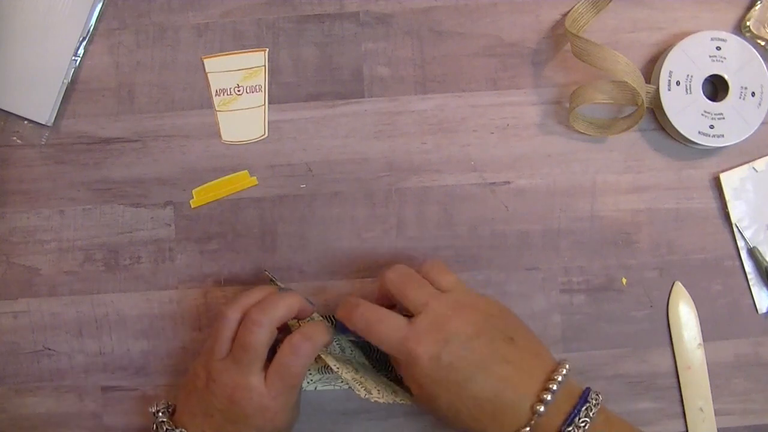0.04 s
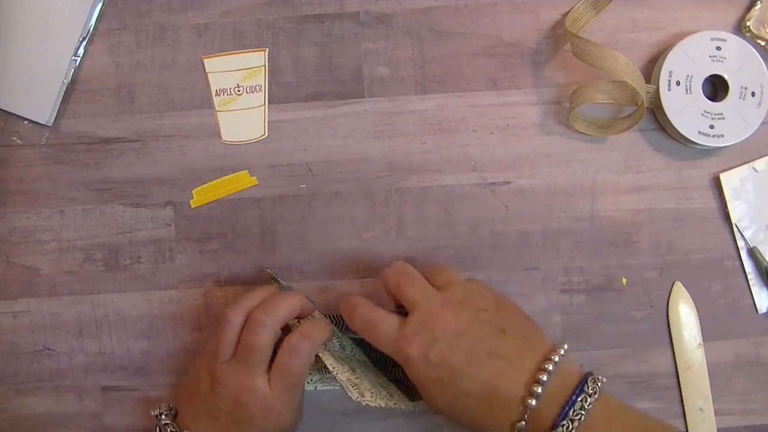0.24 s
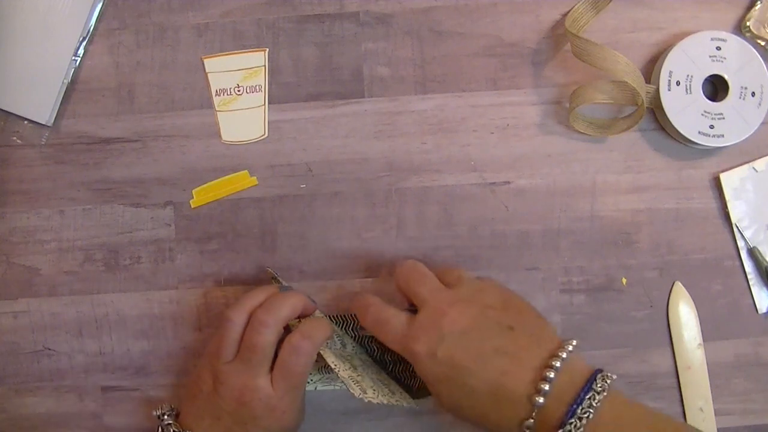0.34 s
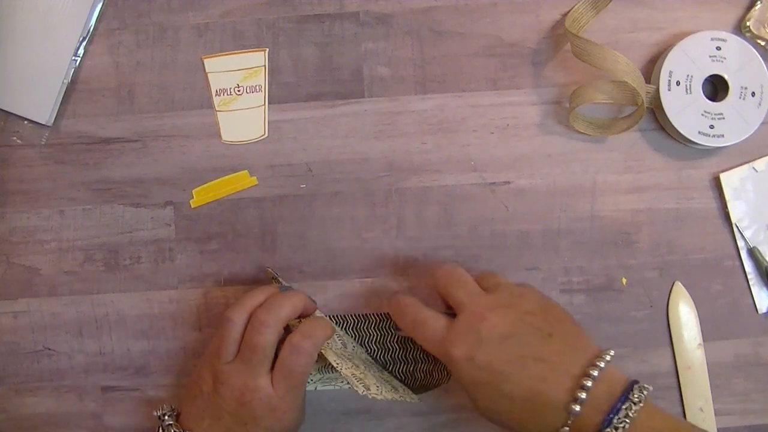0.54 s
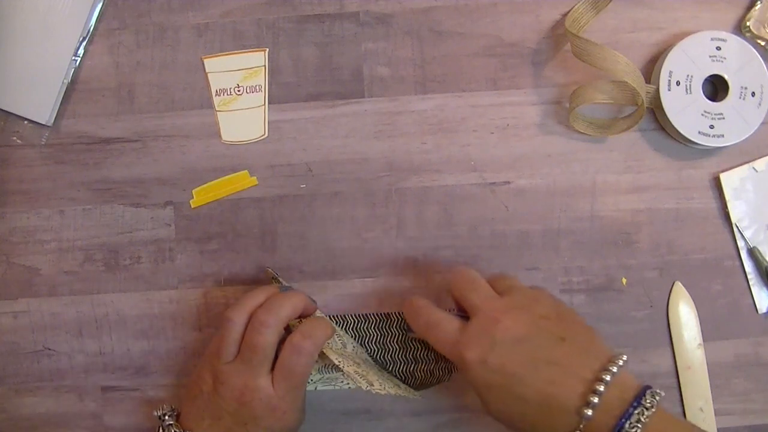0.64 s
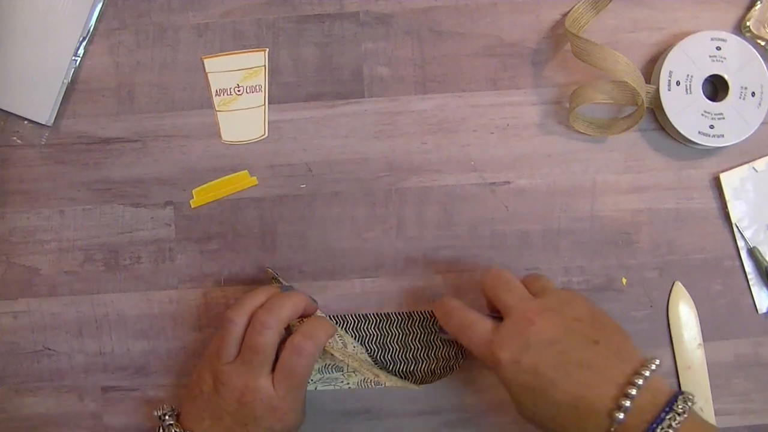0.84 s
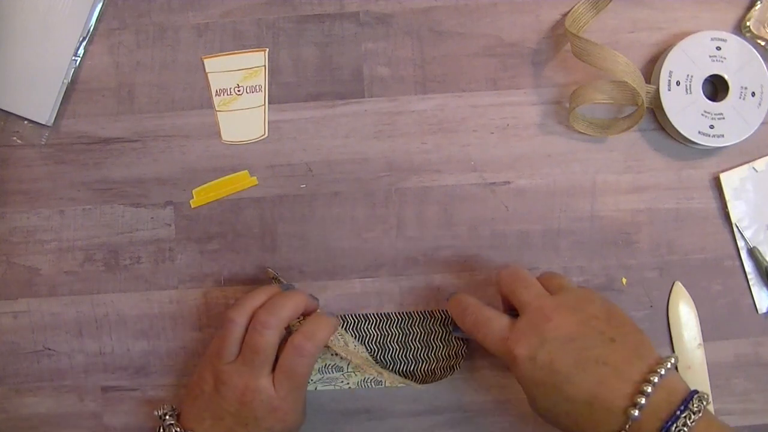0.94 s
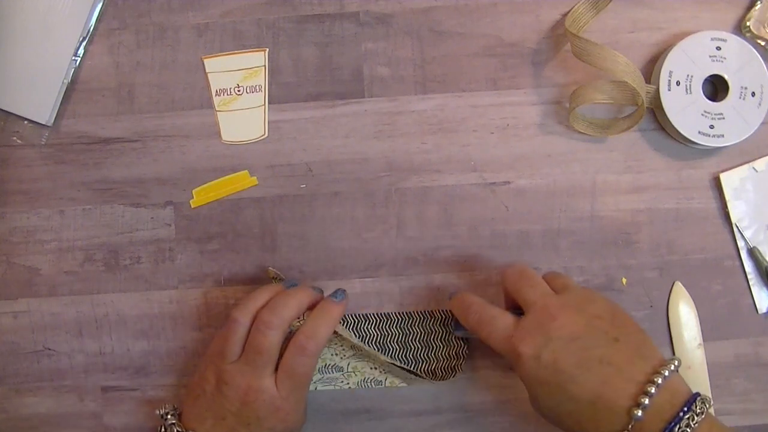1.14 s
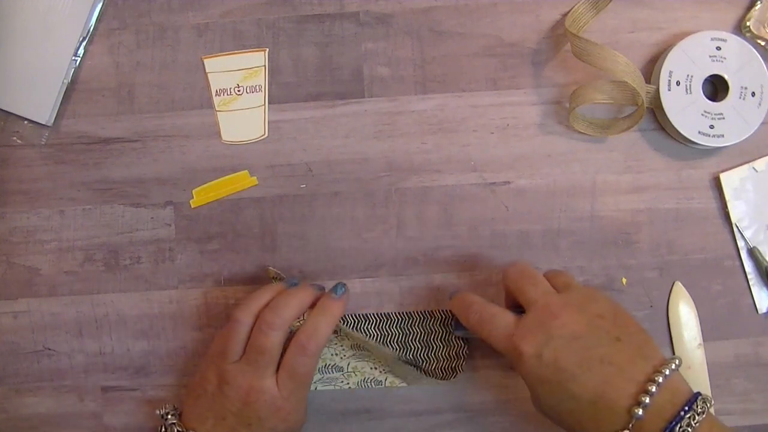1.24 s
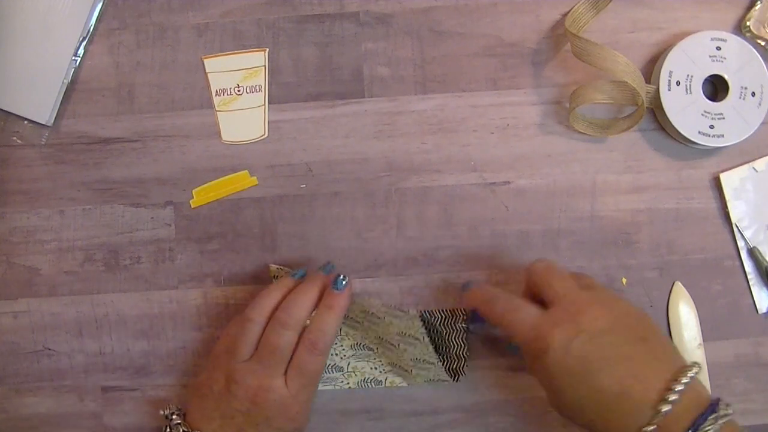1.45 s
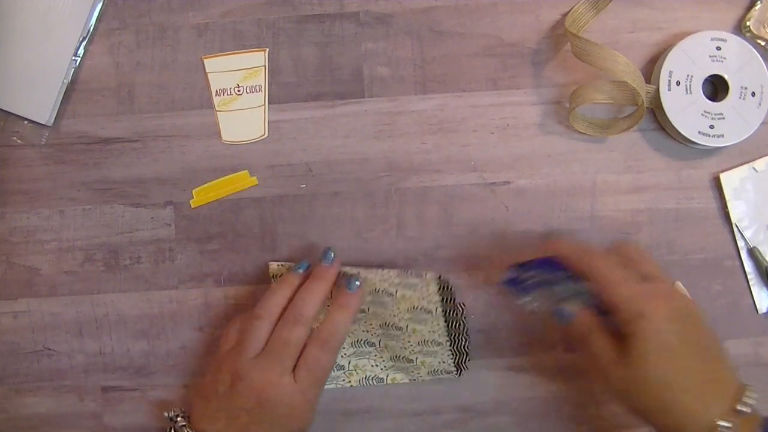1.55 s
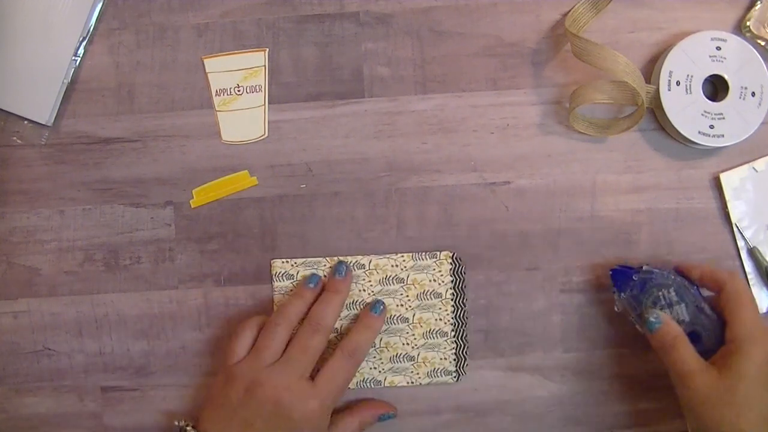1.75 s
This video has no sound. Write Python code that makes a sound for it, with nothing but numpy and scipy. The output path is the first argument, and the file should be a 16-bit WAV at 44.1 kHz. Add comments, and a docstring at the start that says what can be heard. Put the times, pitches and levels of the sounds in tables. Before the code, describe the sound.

An adhesive tape runner rolls over paper, close by in a quiet room. After a faint paper rustle, rapid plastic clicks start at 0.3 seconds and turn into a scratchy scrape with dull table thuds, dying by 1.2 seconds. A second short pull comes at 1.4 seconds. Just before 1.6 seconds the runner knocks lightly, then hard, and the paper rustles briefly.

```python
"""A handheld tape runner on paper at a craft table: quiet room, stereo microphone close by.
The paper stirs first. From 0.3 s the adhesive lets go in short bursts that ring the plastic shell;
the roll turns into a scratchy scrape, with dull thuds of the table top, and dies by 1.2 s. A second
short pull comes at 1.4 s, then the runner knocks, lightly and then hard, and the paper rustles."""
import sys
import numpy as np
from scipy import signal
from scipy.fft import rfft, irfft
from scipy.io import wavfile
from scipy.ndimage import uniform_filter1d

SR = 44100
rng = np.random.default_rng(int(sys.argv[2]) if len(sys.argv) > 2 else 0)


def unload_audio(sound):
    """Save the sound as a 16-bit wav file, at the path given as the first command line argument."""
    columns = np.transpose(np.atleast_2d(sound))
    # keep every value between -1 and 1, then stretch to whole-number steps
    steps = np.round(np.clip(columns, -1, 1) * 32767)
    wavfile.write(sys.argv[1], SR, steps.astype(np.int16))


N = 79380  # 1.8 s


def amp(db):
    return 10 ** (np.asarray(db) / 20)


def unit_rms(x):
    return x / np.sqrt(np.mean(x ** 2) + 1e-20)


def curve_at(points, hz):
    f, value = np.transpose(points)
    return np.interp(np.log(hz + 1), np.log(f + 1), value)


def add(mix, start, sound):
    part = mix[round(start * SR):][:len(sound)]
    part += sound[:len(part)]


def colour(x, spectrum):
    """Causal filter with the given dB spectrum."""
    log_gain = np.log(amp(curve_at(spectrum, abs(np.fft.fftfreq(4096, 1 / SR)))))
    phase = -signal.hilbert(log_gain).imag
    impulse = np.fft.ifft(np.exp(log_gain + 1j * phase)).real[:2048]
    return signal.oaconvolve(x, impulse)[:len(x)]


def ring(x, hz, width):
    """A two-pole resonance."""
    r = np.exp(-np.pi * width / SR)
    return signal.lfilter([1 - r, 0, r - 1], [1, -2 * r * np.cos(2 * np.pi * hz / SR), r * r], x)


def body(x, modes):
    """An object's modes driven by x, at unit RMS."""
    return unit_rms(sum(amp(db) * ring(ring(x, hz, width), hz, width) for hz, width, db in modes))


def snaps(count, per_s, spread_db):
    """Tiny random snaps, a few of them large."""
    chance, side, size = rng.random((count, 3)).T
    strength = amp(-spread_db * np.log(np.maximum(size, .004)))
    return (chance < per_s / SR) * np.sign(side - .5) * strength


def burst(length):
    """A firm snap, then a cluster that swells and fades; returns it, its fade and a level scale."""
    t, length = np.arange(4000) / SR, max(length, .001)
    rise = np.minimum(t / (.07 * length), 1)
    fade = np.exp(-(t / length) ** 2.2)
    cluster = snaps(len(t), per_s=18000, spread_db=2) * rise * fade
    cluster[8] = 1
    return cluster, fade, np.sqrt(np.mean(fade ** 2)) / 2.97


# Spectrum of the empty room: f/Hz, relative level/dB
ROOM_SPECTRUM = [(50, -12), (95, 4.5), (170, 0), (300, -6), (530, -8), (900, -16), (1600, -18.5),
                 (3000, -24), (8000, -32.5), (16000, -45)]
# How alike the two capsules hear: f/Hz, likeness/0-1
LIKENESS = [(30, 0.94), (80, .97), (150, 0.85), (300, 0.45), (700, 0.72), (1500, 0.21), (12000, 0.33)]

def room_tone():
    """Low steady hum and hiss of the room, all around the microphone."""
    hz = np.fft.rfftfreq(N, 1 / SR)
    left, other = rfft(rng.standard_normal((2, N)))
    same = curve_at(LIKENESS, hz)
    right = same * left + np.sqrt(1 - same ** 2) * other
    return amp(-38) * unit_rms(irfft(np.array([left, right]) * amp(curve_at(ROOM_SPECTRUM, hz)), N))


# Course of the scrape: t/s, scratch/dB, shell/dB, table/dB, treble/dB
SCRAPE_LEVELS = [(0, -69, -71, -67, -76), (.05, -74, -38.5, -54, -71), (0.111, -43.5, -39, -42.5, -40),
                 (.21, -35.5, -64, -44, -50.5), (0.291, -45, -33, -40, -75), (0.323, -30, -33, -27.5, -54),
                 (.45, -24, -59, -49.5, -34), (.68, -26.5, -41, -40, -49), (.76, -19.5, -21, -29.5, -42),
                 (.85, -17, -29, -27.5, -35), (0.999, -15, -31, -22.5, -32),
                 (1.065, -14, -36.5, -27.5, -29), (1.154, -19.5, -33.5, -32, -31),
                 (1.221, -49.5, -73, -48, -76), (1.40, -68, -52, -48, -73), (1.431, -27.5, -38, -44.5, -41),
                 (1.58, -30, -29, -37, -66), (1.679, -44, -78, -48, -36.5), (1.8, -43.5, -51, -63, -57)]
# Drifting pitch of the taut tape: t/s, f/Hz
TAPE_PITCH = [(.3, 4260), (.5, 4060), (.66, 3070), (.83, 3400), (.88, 4230), (1.1, 4090), (1.8, 2500)]
# Spectra of the paper's scratch and the fine treble: f/Hz, relative level/dB
SCRATCH_SPECTRUM = [(600, -20), (1000, -3), (2000, -6), (3200, -5.5), (4500, -7.5), (6200, -11.5),
                    (8000, -13.5), (12000, -22.5)]
TREBLE_SPECTRUM = [(5000, 0), (8500, 35), (11500, 34), (14000, 25.5), (15800, 14)]
# Modes of the plastic shell and the table top: f/Hz, width/Hz, relative level/dB
SHELL_MODES = [(1185, 125, 8), (1335, 135, 13), (1480, 115, 9)]
TABLE_MODES = [(339.2, 190, -4), (409, 94, -0.5), (498, 98, 2.5), (784, 330, -1.5)]

def scrape():
    """Grit under the roller drives the paper, the tape, the shell and the table top."""
    flicker_db, tape_db, tape_width_hz = 1.1, -7.5, 410
    t = np.arange(N) / SR
    times, *levels = np.transpose(SCRAPE_LEVELS)
    scratch, shell, table, treble = (amp(np.interp(t, times, db)) for db in levels)
    flicker = unit_rms(uniform_filter1d(uniform_filter1d(rng.standard_normal(N), 300), 300))
    grit = snaps(N, per_s=11000, spread_db=2.6) * amp(flicker_db * flicker)
    # A resonance that follows the tape's pitch.
    tape_hz = np.interp(t, *np.transpose(TAPE_PITCH))
    carrier = np.exp(2j * np.pi * np.cumsum(tape_hz) / SR)
    r = np.exp(-np.pi * tape_width_hz / SR)
    tape = (carrier * signal.lfilter([1 - r], [1, -r], grit / carrier)).real
    paper = unit_rms(colour(grit, SCRATCH_SPECTRUM))
    return (scratch * unit_rms(paper + amp(tape_db) * unit_rms(tape))
            + shell * body(grit, SHELL_MODES)
            + table * body(grit, TABLE_MODES)
            + treble * unit_rms(colour(grit, TREBLE_SPECTRUM)))


# Paper ticks and rustles, and one light knock of the runner (at 1.541 s):
# t/s, level/dB, strongest f/Hz, relative treble/dB, length/s
RUSTLES_AND_KNOCK = [(0.053, -17.5, 1300, -33, 0.023), (0.071, -17, 1370, -48, 0.0087),
                     (0.095, -20.5, 1700, -17, 0.0085), (0.2192, -14, 3280, -24, 0.023),
                     (0.2514, -17, 4030, -17, 0.011), (1.276, -20, 2780, -23, 0.006),
                     (1.321, -27, 1320, -18, 0.012), (1.333, -20, 3820, -14, 0.0052),
                     (1.359, -16, 4720, -10.5, 0.0052), (1.541, -5, 2000, -28, 0.0044),
                     (1.606, -10.5, 1930, -9, 0.0035), (1.6108, -9.5, 2270, -22, 0.0022),
                     (1.6428, -12.5, 2120, -14, 0.02), (1.7447, -25, 1870, -20, 0.013)]

def rustles_and_light_knock():
    """Small clusters of snaps, each with its own colour: the paper, and one light knock of the runner."""
    out = np.zeros(N)
    for start, db, hz, treble_db, length in RUSTLES_AND_KNOCK:
        cluster, _, scale = burst(length)
        spectrum = [(400, -20), (hz, 0), (hz + 4000, treble_db / 2), (15000, treble_db)]
        add(out, start, amp(db) * scale * unit_rms(colour(cluster, spectrum)))
    return out


# Dull thuds of the table top: t/s, level/dB, f/Hz
TABLE_THUDS = [(0.054, -23, 250), (.488, -21.5, 540), (0.829, -12, 348), (0.84, -9, 330), (0.881, -11, 390),
               (0.924, -11, 385), (1.467, -25, 334)]

def table_thuds():
    """The table top rings briefly on one low note."""
    rise_s, t60_s = .0031, .049
    out, t = np.zeros(N), np.arange(4000) / SR
    envelope = np.minimum(t / rise_s, 1) * amp(-60 * t / t60_s)
    for start, db, hz in TABLE_THUDS:
        add(out, start, amp(db) * envelope * np.sin(2 * np.pi * hz * t))
    return out


# Adhesive letting go: t/s, level/dB, relative treble/dB, ring f/Hz, length/s, relative shell/dB
ADHESIVE_SLIPS = [(0.3034, 1.5, 2, 4160, 0.002, -31), (0.3049, -4.5, -5, 3800, 0.0027, -23),
                  (0.3325, 1.5, -12, 4500, 0.0037, -10), (0.3545, -2.5, -7, 4330, 0.005, -10),
                  (0.3766, -7.5, 0, 6500, 0.0075, -2.5), (0.387, -11, -15, 4240, 0.0023, -3),
                  (.398, -2, -5.5, 6330, .005, -10), (0.4192, -4, 0, 5100, 0.0025, -7),
                  (0.4356, -2.5, -15, 6030, 0.0086, -6.5), (0.4573, -1, -6, 3630, 0.0048, -20.5),
                  (0.4716, -6, -14, 6500, 0.0055, -10), (0.488, -6.5, -11, 3770, 0.0095, -4),
                  (0.5058, -4.5, -11, 6540, 0.009, -4), (0.521, -10, -21, 7000, 0.013, -13),
                  (0.543, -4, -14, 3550, 0.0076, -8.5), (.5645, -4, -20, 3450, 0.0077, -12),
                  (0.5825, -2, -29, 3460, 0.0081, -4), (0.604, -1.5, -9.5, 3570, 0.006, -11),
                  (0.6234, -4.5, -15, 3500, 0.0091, -4), (.6445, -15, 6, 8600, 0.0017, -20),
                  (0.6471, -1, -14, 3240, 0.0067, -14), (0.677, -2, -11, 2960, 0.0062, -6),
                  (0.711, -4, -10, 3200, 0.0082, -6.5), (0.7367, -2.5, -10, 3420, 0.0059, -7.5),
                  (0.759, -1.5, -10, 3280, 0.0055, -7), (0.7794, -5, -7.5, 3320, 0.0075, -14),
                  (0.7968, -4, -15, 4250, 0.0093, -8), (0.818, -5, -16, 3220, 0.0093, -7.5),
                  (0.8417, -7, -10, 7100, 0.0065, 1), (0.879, -7, -8, 4160, 0.0059, 2.5),
                  (.9375, -1.5, -19, 3340, 0.004, -6), (0.954, -3.5, -16, 4660, 0.0066, 5),
                  (0.9825, -10, -5, 4200, 0.0073, -4), (0.999, -9.5, -1, 5070, 0.0037, 9.5),
                  (1.047, -6.5, -19, 4200, 0.014, -14), (1.4099, -2, -12, 5360, 0.0055, -9.5),
                  (1.425, -12.5, -12, 3160, 0.0058, -19), (1.4416, -1, -10, 5130, 0.0043, -10.5),
                  (1.466, -3, -16, 4130, 0.0071, -4), (1.4812, -4.5, -12, 5400, 0.0072, -9),
                  (1.511, -4, -11.5, 6830, 0.0057, -8)]
# Spectrum of a crack: f/Hz, relative level/dB
CRACK_SPECTRUM = [(1000, -30), (2000, 2.5), (4000, 6.5), (6200, 3.5), (8000, 3), (11000, -8.5)]

def adhesive_slips():
    """Each release cracks, rings one bright mode and hums the shell; the treble dies first."""
    out = np.zeros(N)
    for start, db, treble_db, hz, length, shell_db in ADHESIVE_SLIPS:
        cluster, fade, scale = burst(length)
        crack = unit_rms(colour(cluster, CRACK_SPECTRUM))
        bright = amp(-4.5) * unit_rms(ring(cluster, hz, width=280))
        shell = amp(shell_db) * body(cluster, SHELL_MODES)
        treble = amp(treble_db) * unit_rms(colour(cluster * fade ** 3.5, TREBLE_SPECTRUM))
        add(out, start, amp(db) * scale * (unit_rms(crack + bright) + shell + treble))
    return out


# Runner knocking the table: t/s, level/dB
RUNNER_KNOCKS = [(.9995, -10.5), (1.5608, 2.5), (1.571, -8.5), (1.5794, -8)]
# Modes of the struck runner: f/Hz, width/Hz, relative level/dB
RUNNER_MODES = [(910, 185, 2), (2020, 220, 1), (2600, 230, -9), (3070, 300, -7)]

def runner_knocks():
    """A short rough blow cracks and rings the runner."""
    blow_s = .000057
    out, t = np.zeros(N), np.arange(4000) / SR
    ringing = body(t * np.exp(-t / blow_s), RUNNER_MODES)
    for start, db in RUNNER_KNOCKS:
        cluster, _, scale = burst(length=.0045)
        crack = amp(-11) * unit_rms(colour(cluster, CRACK_SPECTRUM))
        add(out, start, amp(db) * scale * (ringing + crack))
    return out


# Decay of the room: f/Hz, T60/s
ROOM_DECAY = [(300, 0.5), (2000, 0.3), (10000, 0.17)]
# Colour of its reflections: f/Hz, gain/dB
REFLECTION_COLOUR = [(300, -7), (1200, 2)]

def reflections(x):
    """Sparse random echoes reach each capsule; the highs die soonest."""
    length, gap = 16000, 20  # samples
    echoes = np.zeros((2, length))
    slots = np.arange(100, length - gap, gap)
    arrivals = slots + rng.integers(0, gap, (2, len(slots)))
    np.put_along_axis(echoes, arrivals, rng.choice([-1., 1.], arrivals.shape), 1)
    hz, t, bands = signal.stft(echoes, SR, nperseg=256)
    decay = amp(-60 * t / curve_at(ROOM_DECAY, hz)[:, None])
    tails = signal.istft(bands * decay, SR, nperseg=256)[1]
    tails /= np.linalg.norm(tails[0])
    return signal.fftconvolve(colour(x, REFLECTION_COLOUR)[None], tails, axes=1)[:, :N]


# Balance at the microphone: f/Hz, left minus right/dB
BALANCE = [(300, 0), (1500, 5), (5000, 2), (14000, 1)]

def stereo_microphone(x):
    """The source is wide and louder on the left: the two capsules hear it partly unlike."""
    lag_s = .000007
    hz, _, bands = signal.stft(x, SR, nperseg=64, noverlap=48)
    hz = hz[:, None]
    scatter = np.exp(2j * np.pi * uniform_filter1d(rng.random(bands.shape), 3, axis=1) * 3)
    delay = np.exp(-2j * np.pi * hz * lag_s)
    same = curve_at(LIKENESS, hz)
    tilt = amp(curve_at(BALANCE, hz) / 2)
    left = bands * (same * delay + np.sqrt(1 - same ** 2) * scatter)
    return signal.istft(np.array([left * tilt, bands / tilt]), SR, nperseg=64, noverlap=48)[1][:, :N]


def scene():
    """The craft table up close, the room faint behind it."""
    direct = adhesive_slips() + rustles_and_light_knock() + runner_knocks() + table_thuds() + scrape()
    room = amp(-12.5) * reflections(direct)
    return stereo_microphone(direct) + room + room_tone()


def record(dry):
    """Bass cut and band limit of the recorder."""
    low_hz, high_hz = 65.6, 15600
    bass_cut = signal.butter(3, low_hz, "high", fs=SR, output="sos")
    band_limit = signal.firwin(1023, high_hz, window=("kaiser", 11), fs=SR)
    return signal.oaconvolve(signal.sosfilt(bass_cut, dry), band_limit[None], "same")


dry = scene()
out = record(dry)
unload_audio(out)
```